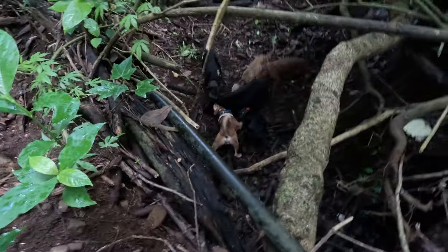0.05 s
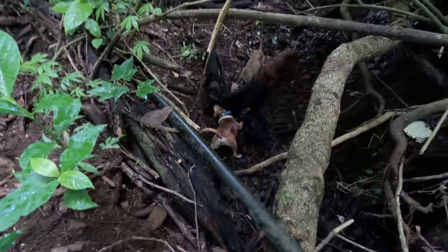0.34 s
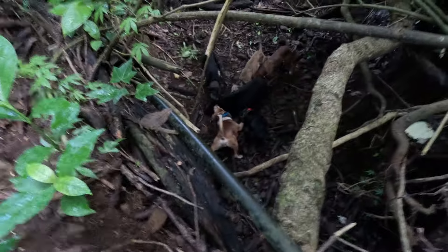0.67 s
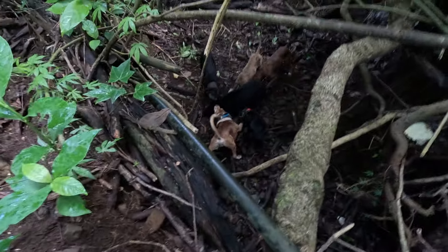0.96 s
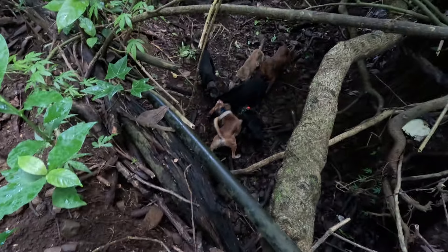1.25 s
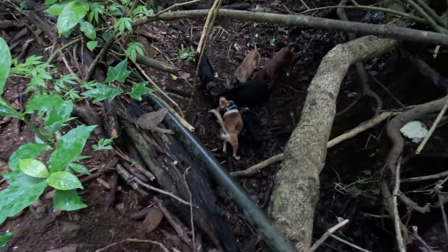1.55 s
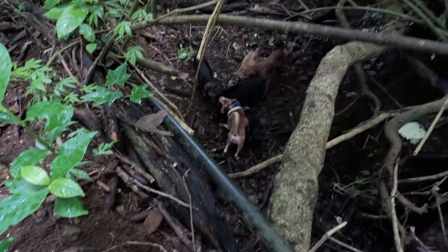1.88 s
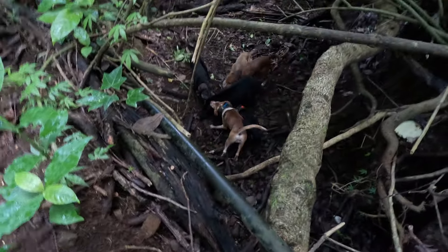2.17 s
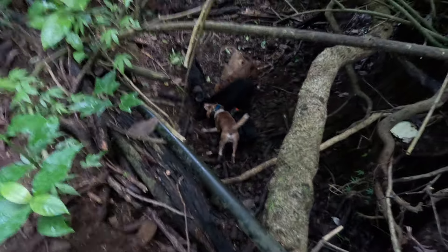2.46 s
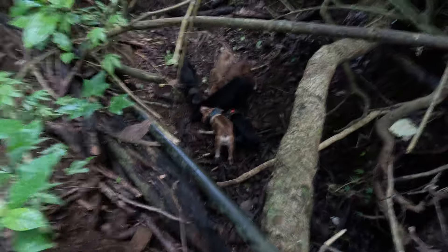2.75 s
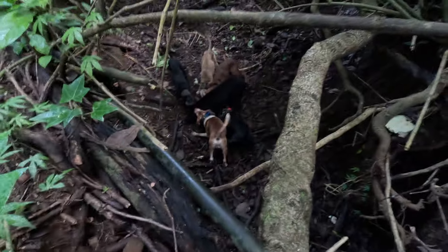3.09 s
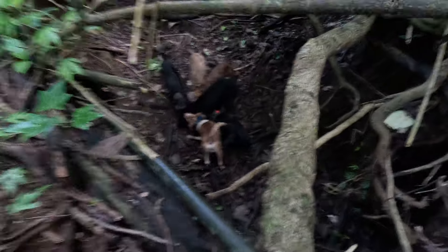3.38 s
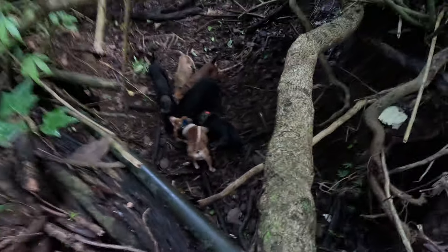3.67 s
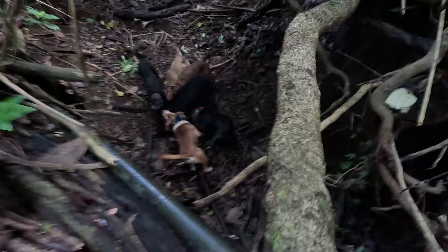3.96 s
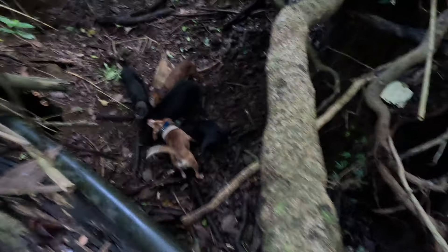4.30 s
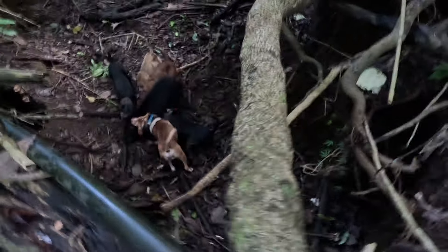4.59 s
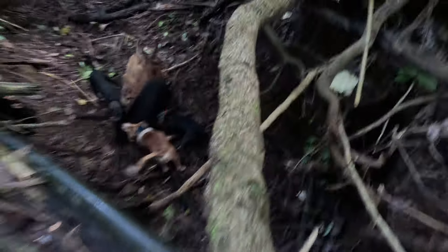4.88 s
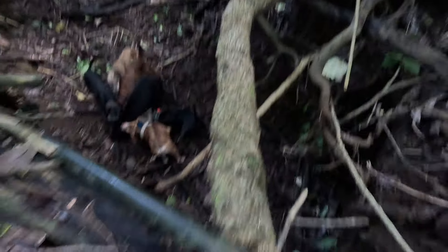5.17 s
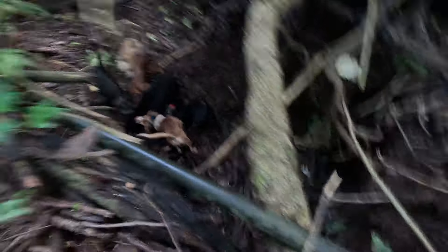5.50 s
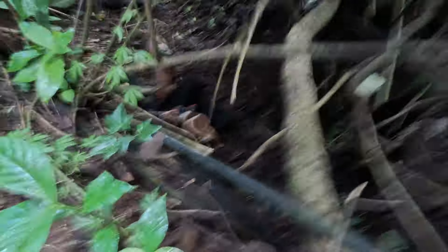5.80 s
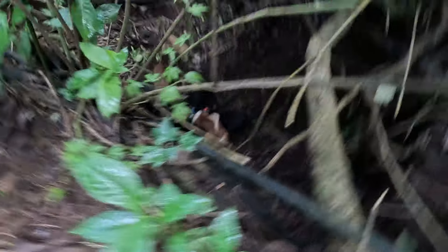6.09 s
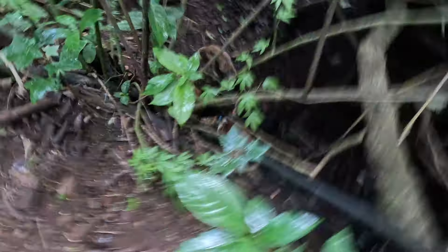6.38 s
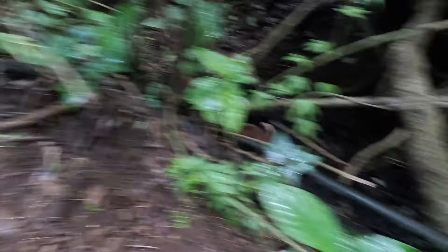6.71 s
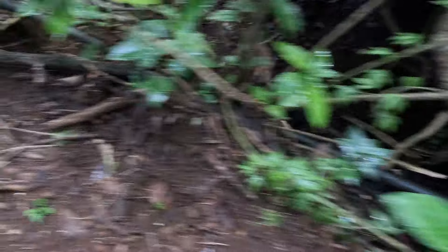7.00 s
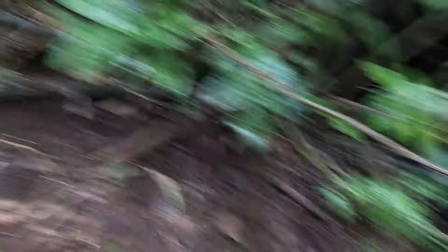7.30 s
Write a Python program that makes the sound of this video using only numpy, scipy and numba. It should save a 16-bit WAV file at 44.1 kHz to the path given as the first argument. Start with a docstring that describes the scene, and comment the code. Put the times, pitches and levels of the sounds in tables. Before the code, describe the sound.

A wild pig screams four times, loud and rasping, with one hoarse grunt, over trampled leaves and snapping twigs.

```python
"""Wild pig held by dogs

In a wooded gully a pig screams four times and a dog gives one hoarse bark. By the source-filter principle, the
pig's vocal folds excite the resonances of its tract: slow pops speed up into a ragged rasp and at times lock
onto a resonance and whistle. Leaves and twigs are trampled below; a low rumble swells now and then, and a
limiter holds the peaks."""
import sys
import numpy as np
from scipy import signal
from scipy.fft import rfft, irfft, next_fast_len
from scipy.io import wavfile
from scipy.ndimage import uniform_filter1d, minimum_filter1d
from numba import njit

SR = 44100
rng = np.random.default_rng(int(sys.argv[2]) if len(sys.argv) > 2 else 0)


def store_wav(level_fs):
    """Save 16-bit WAV to argv[1]."""
    pcm = np.round(np.clip(np.atleast_2d(level_fs), -1, 1) * 32767)
    wavfile.write(sys.argv[1], SR, pcm.T.astype(np.int16))


N = 328545
TIME = np.arange(N) / SR


def from_db(db):
    """Amplitude ratio of a level in decibels."""
    return 10 ** (np.asarray(db) / 20)


def rms_one(x):
    """Normalisation to unit rms."""
    return x / np.sqrt(np.mean(x ** 2) + 1e-20)


def even(x):
    """Division by the running rms: the level is held at 1 while single pulses survive."""
    power = uniform_filter1d(uniform_filter1d(x ** 2, size=1800), size=900)
    return x / np.sqrt(np.abs(power) + 1e-4 * np.mean(x ** 2))


def in_time(rows):
    """Linear interpolation of each column against the first, t/s."""
    times, *columns = np.transpose(rows)
    return [np.interp(TIME, times, column) for column in columns]


def gains(rows):
    """Amplitude envelopes from a table of levels, silent outside its span."""
    inside = uniform_filter1d(((TIME >= rows[0][0]) & (TIME <= rows[-1][0])) * 1., size=200)
    return from_db(in_time(rows)) * inside


def swell(t, half_s):
    """Gaussian envelope of height 1, falling to 1/e at the half-width."""
    return np.exp(-((TIME - t) / half_s) ** 2)


def cut(x, hz, kind, order=2):
    """Butterworth filter."""
    return signal.sosfilt(signal.butter(order, hz, kind, fs=SR, output="sos"), x)


def drift(hz, step=16):
    """Random fluctuation: low-passed noise of unit rms."""
    slow = cut(rng.standard_normal(N // step + 6000), min(hz * step, .4 * SR), "low")[-(N // step + 2):]
    return np.interp(np.arange(N) / step, np.arange(len(slow)), rms_one(slow))


def coloured(x, spectrum):
    """Spectral shaping along a logarithmic frequency axis, to unit rms."""
    hz, db = np.transpose(spectrum)
    size = next_fast_len(N)
    shape = from_db(np.interp(np.log(np.fft.rfftfreq(size, 1 / SR) + 1), np.log(hz), db))
    return rms_one(irfft(rfft(x, size) * shape, size)[..., :N])


def stereo_noise(side_db):
    """Partially coherent white noise in two channels."""
    mid, side = rng.standard_normal((2, N))
    return mid + from_db(side_db) * side * [[1], [-1]]


@njit
def two_pole(x, angle, radius):
    """Time-varying band-pass: pole angle sets the frequency, pole radius the damping."""
    y = np.zeros(len(x))
    for i in range(2, len(x)):
        r = radius[i]
        drive = (1 - r ** 2) / 2 * (x[i] - x[i - 2])
        y[i] = drive + 2 * r * np.cos(angle[i]) * y[i - 1] - r ** 2 * y[i - 2]
    return y


def resonate(x, hz, width_hz):
    """Forced response of a damped resonator with unit peak gain."""
    return two_pole(x, 2 * np.pi * hz / SR * np.ones(N), np.exp(-np.pi * width_hz / SR) * np.ones(N))


# Screams: start t/s, end t/s, pop rate/Hz, popping time/s, speed-up time/s, top rate/Hz, roughness/1,
# sag time/s, snout f/Hz, teeth f/Hz, fizz level/dB, left-right difference/dB
SCREAM_GESTURES = [(-0.4, 2.53, 48.4, 0.055, 0.26, 319, 0.61, 0.13, 3070, 6600, -18, -2.4),
                   (2.996, 3.37, 44.4, 0.11, 0.054, 173, 0.1, 0.025, 3340, 6150, -22.5, -1.5),
                   (4.057, 5.83, 46, 0.058, 0.18, 340, 0.57, 0.12, 3620, 4930, -15, -0.9),
                   (6.315, 7.93, 66.5, 0.005, 0.11, 349, 0.6, 0.088, 3060, 5020, -21, -2.2)]


def current_scream(lead_s=0.033):
    """Step functions of time: the settings of the scream under way."""
    rows = np.array(SCREAM_GESTURES)
    return rows[np.maximum(np.searchsorted(rows[:, 0] - lead_s, TIME) - 1, 0)].T


def effort(age, remaining, pop_rate, pop_s, speed_up_s, top_rate, top_rough, sag_s):
    """Breath drives the folds: pops speed up, hold, then sag and turn ragged as the air runs out."""
    rise = 1 - np.exp(-np.maximum(age - pop_s, 0) / speed_up_s)
    sag = np.exp(-np.maximum(remaining, 0) / sag_s)
    rate = pop_rate * (top_rate / pop_rate) ** (rise * (1 - 0.7 * sag))
    rough = (0.03 + top_rough * rise ** 1.4) * (1 - sag) + 0.6 * sag
    return rate, rough


def folds(rate, rough, jitter=.22, shimmer_db=4, puff_s=0.0074, leak_db=-24):
    """Glottal source: a pulse and a puff of air per cycle; roughness scales jitter, shimmer and air."""
    rate = rate * (1 + .08 * rough * drift(25))
    pulses = np.zeros(N)
    for start, end, *_ in SCREAM_GESTURES:
        span = np.flatnonzero((TIME >= start) & (TIME < end))
        cycles = np.cumsum(rate[span]) / SR
        at = span[np.searchsorted(cycles, np.arange(int(cycles[-1]) + 1) - 1e-9) % len(span)]
        late, strong = rng.standard_normal((1500, 2))[:len(at)].T
        moved = np.clip(at + jitter * rough[at] * late * SR / rate[at], 0, N - 1).astype(int)
        pulses[moved] = from_db(shimmer_db * rough[at] * np.clip(strong, -2, 2))
    fade = np.exp(-2 / (puff_s * SR))
    puffs = np.sqrt(signal.lfilter([1 - fade], [1, -fade], pulses ** 2 + 1e-18))
    air = (np.sqrt(rough) * puffs + from_db(leak_db) * rough ** 2) * rng.standard_normal(N)
    return pulses + air


def scatter(x, echo_db=-12, change_hz=3):
    """Comb filtering: echoes off ground and bodies come and go as the animals struggle."""
    out = x.copy()
    for delay_s in np.geomspace(.0016, .011, 7):
        lag = int(delay_s * SR)
        out[lag:] += from_db(echo_db) * drift(change_hz)[lag:] * x[:-lag]
    return out


# Spells of whistling: start t/s, end t/s, tonal energy share of throat/1, of mouth/1
WHISTLE_SPELLS = [(-0.1, 0.66, 0.93, 0), (-0.05, 0.178, 0, 0.7), (0.448, 1.06, 0, 0.54),
                  (0.602, 0.924, 0.01, 0.34), (1.412, 1.532, 0, 0.94), (2.122, 2.346, 0, 0.71),
                  (4.42, 5.205, 0.23, 0.06), (5.557, 5.686, 0.1, 0.6), (6.399, 7.505, 0.75, 0.04),
                  (6.869, 7.046, 0.12, 0.93)]


def locking(lock_s=0.045):
    """Entrainment: the tonal shares grow as the folds lock onto the throat or mouth resonance."""
    shares = sum(np.outer(pure, np.tanh((TIME - start) / lock_s) - np.tanh((TIME - end) / lock_s)) / 2
                 for start, end, *pure in WHISTLE_SPELLS)
    return np.clip(shares, 0, 1)


def whistling(rasp, hz, share, wobble, flutter_db):
    """Energy partition: a share of a resonance's power goes into a wavering pure tone."""
    phase = 2 * np.pi * np.cumsum(hz * (1 + wobble * drift(85.5))) / SR
    tone = np.sqrt(2) * np.sin(phase) * from_db(flutter_db * drift(22))
    return np.sqrt(1 - share) * even(rasp) + np.sqrt(share) * tone


def upper_modes(source, third_hz, damping):
    """Standing waves in the long tract: nine higher resonances that rise with the third and wander."""
    stretch = (third_hz / 1600) ** 0.37
    out = np.zeros(N)
    for k in range(9):
        hz = (2200 + 690 * k) * stretch + 55 * drift(10)
        width_hz = 290 * damping * (1 + 0.2 * k)
        out += (-1) ** k * from_db(2 * drift(6.3)) * resonate(source, hz, width_hz)
    return out


def snout(upper, hz, rough):
    """Cavity resonance of the snout; more sound bypasses it as roughness grows."""
    radiated = resonate(upper, hz, 260) + (0.53 + 4.2 * rough) * upper
    return from_db(-1.5) * even(cut(cut(radiated, 1200, "high"), 3960, "low", order=5))


def teeth(upper, hz):
    """A heavily damped resonance at the teeth lifts a broad treble band."""
    radiated = resonate(upper, hz, 2250) + from_db(-12.5) * upper
    return even(cut(cut(radiated, 2500, "high", order=3), 7480, "low", order=10))


# Spectrum of the high fizz on the screams: f/Hz, level/dB
FIZZ_SPECTRUM = [(5000, -6), (7800, -5), (9000, -1), (10500, -7.5), (12000, -9.5), (13200, -15),
                 (16000, -26)]


def fizz(source):
    """Random amplitude modulation: a faint high fizz flickers on top of the loud screams."""
    return even(coloured(source, FIZZ_SPECTRUM)) * from_db(1.96 * drift(15))


def chest(source, rate, slow_hz=130):
    """Impulse excitation: slow pops thump in the chest resonance."""
    slow = np.clip(1 - rate / slow_hz, 0, 1)
    return from_db(-5) * slow * even(cut(resonate(source, hz=105, width_hz=100), 430, "low"))


def hum(source):
    """Forced vibration: the body hums faintly under a scream."""
    return from_db(-36.5) * even(cut(resonate(source, hz=168, width_hz=40), 217, "low", order=4))


# Flaring resonances: t/s, half-width/s, f/Hz, level/dB
SHRIEK_FLARES = [(0.453, 0.67, 3240, -19.5), (1.01, 0.084, 2310, -16), (1.154, 0.06, 5640, -15),
                 (1.92, 0.19, 5530, -16), (2.027, 0.15, 2300, -14.5), (2.246, 0.11, 1480, -10),
                 (3.294, 0.055, 3500, -17.5), (4.222, 0.14, 1970, -15.5), (4.362, 0.18, 7300, -17),
                 (4.537, 0.029, 5300, -14), (4.624, 0.044, 3970, -15), (5.145, 0.11, 3380, -17),
                 (5.1, 0.48, 5180, -18.5), (6.471, 0.061, 1720, -19), (6.96, 0.07, 1350, -19),
                 (7.104, 0.46, 5234, -21.5)]


def shrieks(source, relative_width=0.11):
    """Selective amplification: single upper resonances flare up for a moment."""
    out = np.zeros(N)
    for t, half_s, hz, db in SHRIEK_FLARES:
        band = resonate(resonate(source, hz, relative_width * hz), hz, 2 * relative_width * hz)
        out += from_db(db) * swell(t, half_s) * even(band)
    return out


# Formants moved by the jaw, one list per scream: t/s, throat f/Hz, mouth f/Hz
FORMANT_TRACKS = [
    [(0, 500, 980), (.1, 478, 965), (.6, 538, 1245), (1, 535, 1245), (1.15, 585, 1345), (1.5, 680, 1350),
     (2, 830, 1270), (2.33, 700, 1450), (2.46, 450, 640)],
    [(3, 420, 950), (3.16, 360, 770), (3.3, 478, 1020), (3.38, 466, 1030), (3.48, 560, 900)],
    [(4.06, 540, 930), (4.16, 430, 880), (4.3, 570, 940), (4.48, 590, 1260), (4.78, 670, 1470),
     (5.15, 707, 1510), (5.35, 780, 1300), (5.66, 800, 1380), (5.78, 840, 900)],
    [(6.33, 360, 880), (6.45, 475, 960), (6.77, 580, 1180), (6.93, 565, 1330), (7.15, 510, 1470),
     (7.45, 570, 1660)],
]
# Band envelopes, one list per scream: t/s, throat level/dB, mouth level/dB, treble level/dB
BAND_LEVELS = [
    [(0.0, -12, -15.5, -13.5), (0.2, -11.5, -20.5, -16), (0.5, -13.5, -12.5, -17),
     (1.57, -33.5, -9.5, -13.5), (1.82, -19.5, -7.5, -13.5), (2.27, -28.5, -6.5, -16),
     (2.35, -22, -17.5, -11.5), (2.43, -19.5, -20, -21.5), (2.49, -53, -38, -44)],
    [(2.99, -31, -35, -31), (3.024, -22, -29, -22.5), (3.064, -16, -20.5, -26.5), (3.174, -20, -22, -22.5),
     (3.204, -19.5, -21.5, -14), (3.302, -15.5, -18, -10.5), (3.418, -19, -19, -10), (3.462, -17, -25, -29),
     (3.49, -35, -33, -45)],
    [(4.05, -17, -24, -33), (4.058, -25.5, -21.5, -23), (4.144, -16, -10, -11.5), (4.312, -21.5, -14, -7.5),
     (4.52, -20, -9, -12), (4.976, -23.5, -12, -14), (5.686, -24.5, -8.5, -14.5), (5.75, -19.5, -15.5, -19),
     (5.83, -40, -28.5, -38)],
    [(6.31, -40, -48, -50), (6.316, -32, -43, -39), (6.42, -25.5, -26, -28.5), (6.44, -22, -27.5, -16.5),
     (6.728, -22, -18, -12), (7.22, -25, -15, -15), (7.264, -31.5, -14.5, -13),
     (7.434, -17.5, -10.5, -13.5), (7.45, -30, -17, -13)],
]


def screams(bright_rate_hz=364, glide_hz=450, glide_s=0.031):
    """Source-filter principle: the folds drive the resonances of throat, mouth, snout and teeth."""
    start, end, *drive, snout_hz, teeth_hz, fizz_db, _ = current_scream()
    age = np.maximum(TIME - start, 0)
    rate, rough = effort(age, end - TIME, *drive)
    throat_lock, mouth_lock = locking()
    rough = np.clip(rough * (1 - 0.3 * throat_lock), 0, 1)  # whistling steadies the folds
    source = scatter(folds(rate, rough))

    throat_hz, mouth_hz = in_time([point for track in FORMANT_TRACKS for point in track])
    # the mouth resonance pushes the third one up; at each onset it glides down into place
    third_hz = np.hypot(1225, mouth_hz) + glide_hz * np.exp(-age / glide_s)
    damping = 0.23 + 1.67 * rough  # ragged folds stay ajar and damp the tract

    upper = upper_modes(source, third_hz, damping)
    octaves = np.log2(rate / bright_rate_hz)  # slower folds sound duller
    teeth_gain = from_db(6 * octaves - 3 * throat_lock ** 3)  # so does a whistling throat
    treble = snout(upper, snout_hz, rough) - teeth_gain * teeth(upper, teeth_hz)
    treble += from_db(fizz_db + 3.5 * octaves) * fizz(source)

    throat = cut(resonate(source, throat_hz, 70 * damping), [290, 850], "band")
    throat = whistling(throat, throat_hz, throat_lock, wobble=0.0161, flutter_db=3.5)
    throat += chest(source, rate)

    third = from_db(-4.5) * resonate(source, third_hz, 170 * damping)
    mouth = cut(resonate(source, mouth_hz, 125 * damping) - third, [880, 2700], "band")
    mouth = whistling(mouth, mouth_hz, mouth_lock, wobble=0.0149, flutter_db=1.5)
    mouth += hum(source)

    throat_gain, mouth_gain, treble_gain = sum(gains(rows) for rows in BAND_LEVELS)
    return throat_gain * throat + mouth_gain * mouth + treble_gain * treble + shrieks(source)


def gully(x, near_db=-6.5, near_s=0.012, far_db=-17, t60=0.46):
    """Reverberation, distinct in each channel: trunks scatter treble, the banks return a dull tail."""
    age = TIME[:SR]
    near, far = rng.standard_normal((2, 2, SR)) * (age > .002)
    near = cut(near, 900, "high", order=1) * np.exp(-age / near_s)
    far = cut(far, 4200, "low", order=1) * from_db(-60 * age / t60)
    echoes = (from_db(near_db) * rms_one(near) + from_db(far_db) * rms_one(far)) / np.sqrt(2 * SR)
    return x + signal.fftconvolve(x[None], echoes, axes=1)[:, :N]


# Spectrum of the low rumble: f/Hz, level/dB
RUMBLE_SPECTRUM = [(10, -30), (22, 3), (42, -2), (70, -1.5), (110, -4.5), (200, -8.5), (300, -14),
                   (500, -49.5)]
# Swells of the rumble: t/s, half-width/s, level/dB
RUMBLE_SWELLS = [(0.057, 0.17, -29), (3.095, 0.098, -33), (3.56, 0.34, -39), (4.21, 0.23, -24.5),
                 (5.875, 0.15, -29.5), (6.43, 0.17, -31.5), (7.378, 0.75, -37.5)]


def rumble(floor_db=-43.5):
    """Amplitude-modulated noise: a low rumble swells now and then, mostly as screams begin."""
    level = from_db(floor_db) + sum(from_db(db) * swell(t, half_s) for t, half_s, db in RUMBLE_SWELLS)
    noise = coloured(stereo_noise(side_db=-12), RUMBLE_SPECTRUM)
    return level * rms_one(cut(noise, 340, "low"))


# Spectrum of trampled leaves: f/Hz, level/dB
LEAF_SPECTRUM = [(80, -17), (200, 0.5), (450, 1), (800, -2), (1500, -1.5), (2500, -5.5), (3500, -7.5),
                 (5000, -14), (8000, -16), (9500, -29.5), (12500, -33), (16000, -50)]
# Lulls and surges of the trampling: t/s, half-width/s, level change/dB
TRAMPLING_CHANGES = [(2.747, 0.19, -14), (3.586, 0.027, 5.5), (6.212, 0.18, -2.5)]


def scuffle(base_db=-32.5):
    """Superposition: the tiny crackles of dry leaves under paws merge into clumps of noise."""
    clumps_db = 2 * drift(12)
    crackle = from_db(0.6 * drift(260) + clumps_db)
    level_db = base_db + sum(db * swell(t, half_s) for t, half_s, db in TRAMPLING_CHANGES)
    return from_db(level_db) * coloured(stereo_noise(side_db=-9) * crackle, LEAF_SPECTRUM)


# Snapping twigs: t/s, relative peak level/dB, ring f/Hz
TWIG_SNAPS = [(2.7194, -31, 2230), (2.74, -29, 4730), (2.7847, -33, 1520), (2.853, -30.5, 2770),
              (2.8987, -31, 2820), (2.9417, -39, 1010), (3.579, -21, 1410), (3.8007, -24, 2630),
              (3.9863, -20, 1590), (6.3365, -16.5, 1110)]


def twigs(snap_s=0.0079):
    """Brittle fracture: each twig breaks with a short crack and a heavily damped ring."""
    out, age = np.zeros(N), TIME[:3000]
    for t, db, hz in TWIG_SNAPS:
        crack = cut(rng.standard_normal(len(age)) * np.exp(-age / snap_s), 7700, "low", order=4)
        snap = cut(crack, [0.81 * hz, 1.15 * hz], "band", order=1) + 0.33 * crack
        at = int(t * SR)
        out[at:at + len(age)] += from_db(db + 1) * snap / np.abs(snap).max()
    return out


# Resonances of the slack throat: f/Hz, bandwidth/Hz, level/dB
BARK_FORMANTS = [(454, 140, 1.5), (706, 33, 8.5), (863, 73, 4.5), (1210, 76, 1), (1470, 85, 2),
                 (2390, 190, -11.5), (2870, 140, -11)]


def bark(t=5.978, half_s=0.051, db=-6.5):
    """Noise excitation: a short, fluttering breath sounds the resonances of a slack throat."""
    breath = rng.standard_normal(N) * from_db(0.82 * drift(150))
    voice = sum((-1) ** k * from_db(mode_db) * resonate(breath, hz, width_hz)
                for k, (hz, width_hz, mode_db) in enumerate(BARK_FORMANTS))
    return from_db(db) * swell(t, half_s) * even(cut(voice, [360, 3800], "band", order=4))


def scene():
    """Superposition: pig, dog and twigs, placed by a level difference, add to the leaves and the rumble."""
    pan_db = uniform_filter1d(current_scream()[-1], size=4000)
    struggle = gully(screams() + bark() + twigs()) * from_db(pan_db * [[.5], [-.5]])
    return struggle + scuffle() + rumble()


def record(dry, ceiling=1.075, window=90, cutoff_hz=15900):
    """Peak limiting: the gain ducks at each peak, overshoot is clipped, and a low-pass cuts the top."""
    needed_gain = ceiling / np.maximum(np.abs(dry).max(axis=0), ceiling)
    gain = uniform_filter1d(minimum_filter1d(needed_gain, size=window), size=window // 2)
    gain = uniform_filter1d(gain, size=window // 2)
    low_pass = signal.ellip(10, .1, 80, cutoff_hz, fs=SR, output="sos")
    return signal.sosfilt(low_pass, np.clip(dry * gain, -1, 1))


dry = scene()
out = record(dry)
store_wav(out)
```